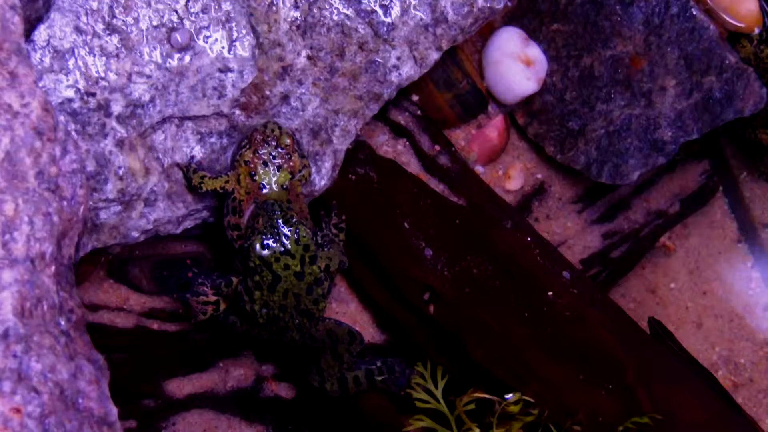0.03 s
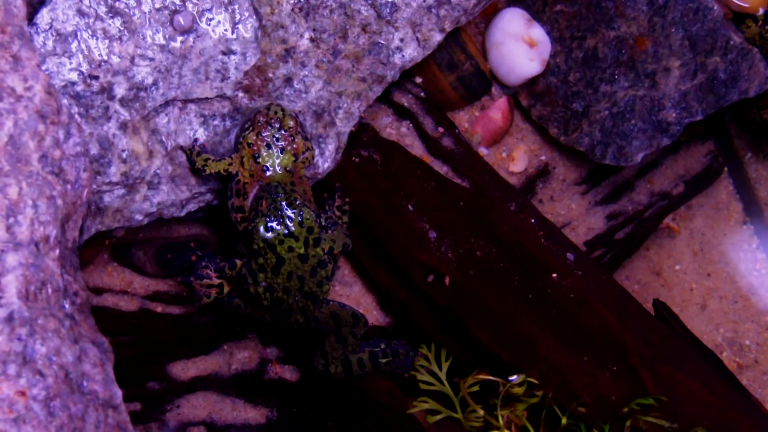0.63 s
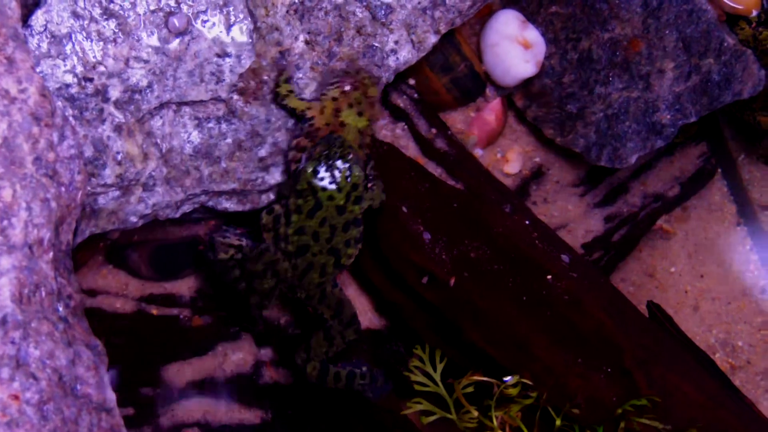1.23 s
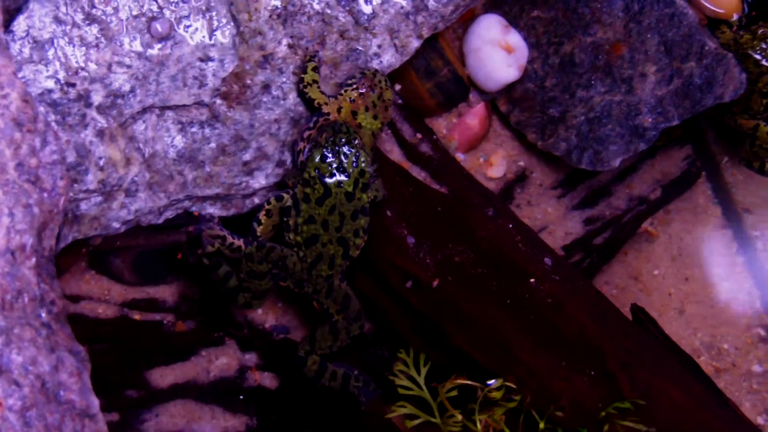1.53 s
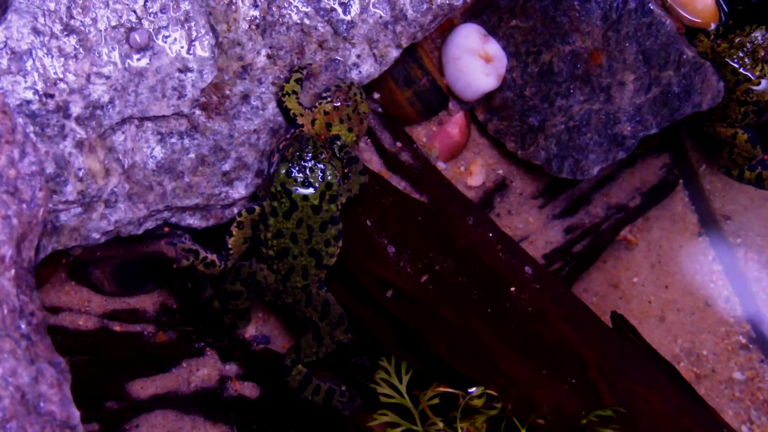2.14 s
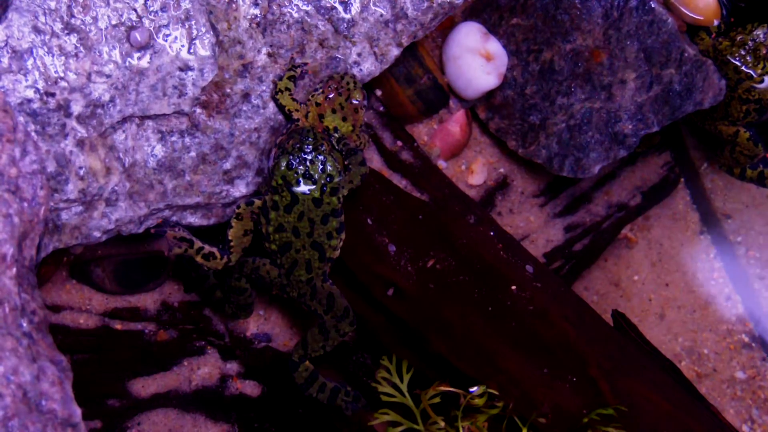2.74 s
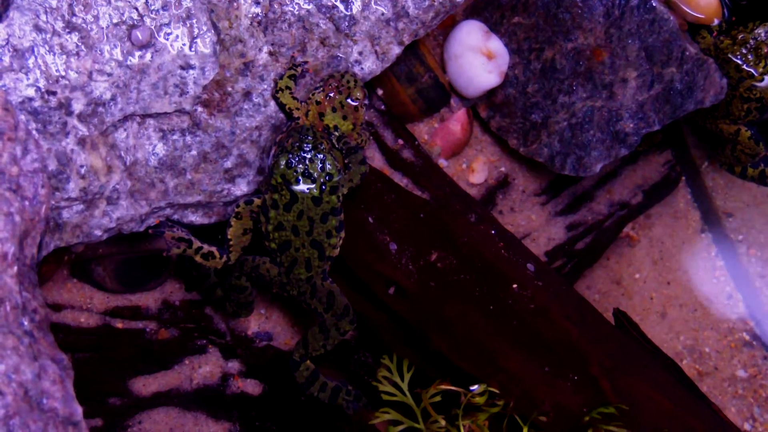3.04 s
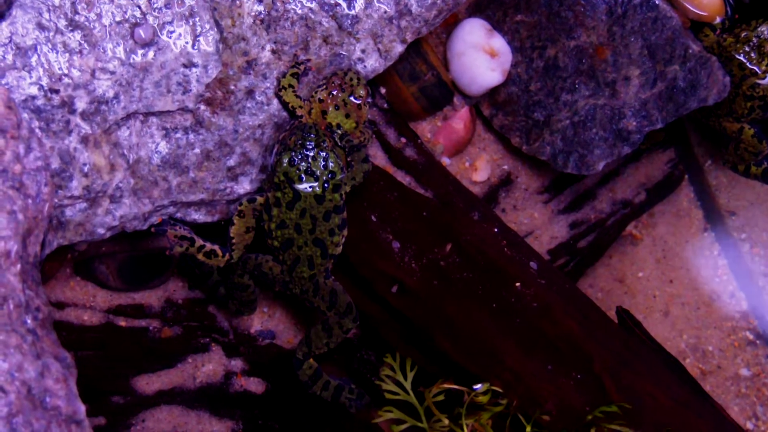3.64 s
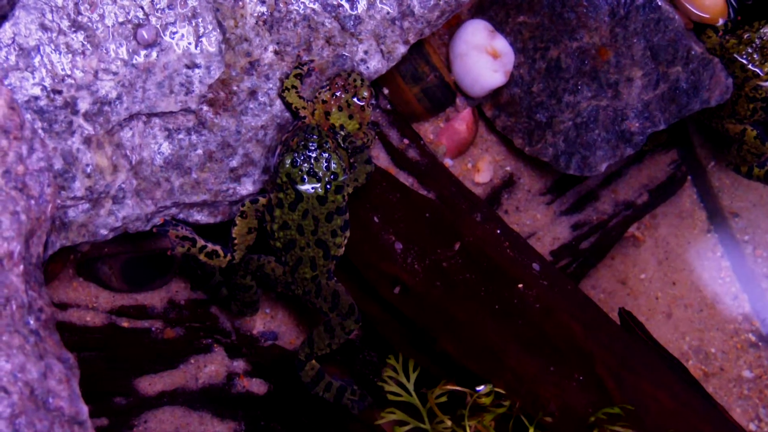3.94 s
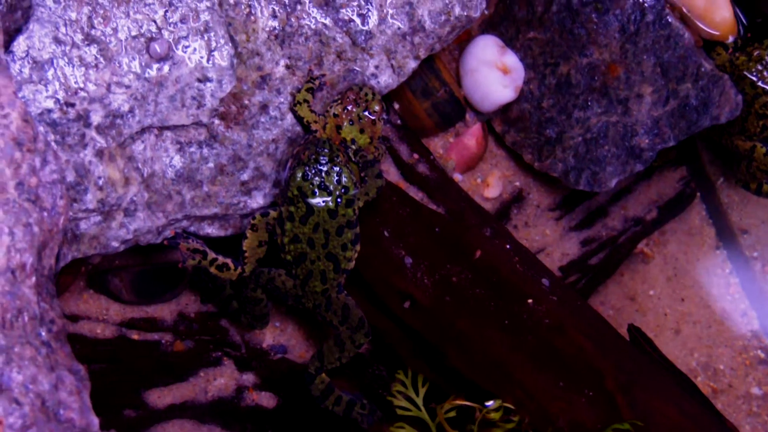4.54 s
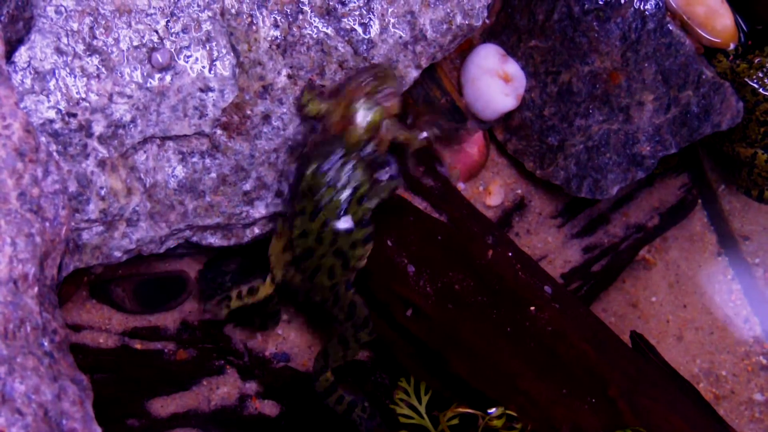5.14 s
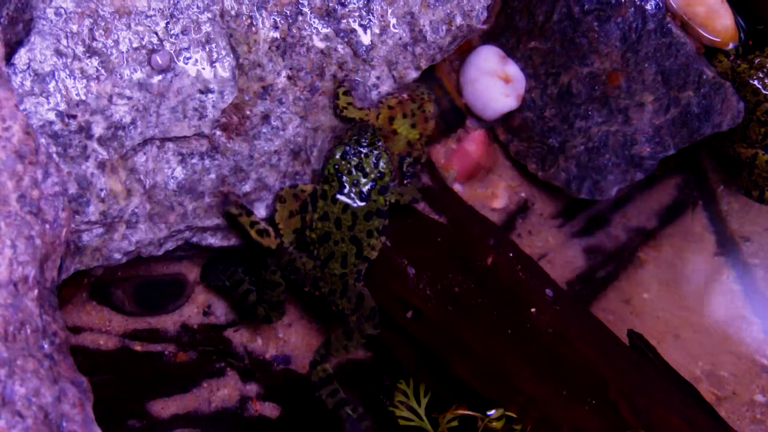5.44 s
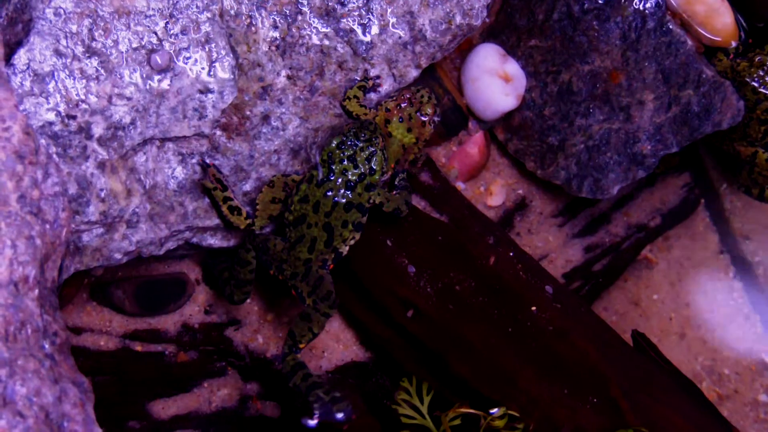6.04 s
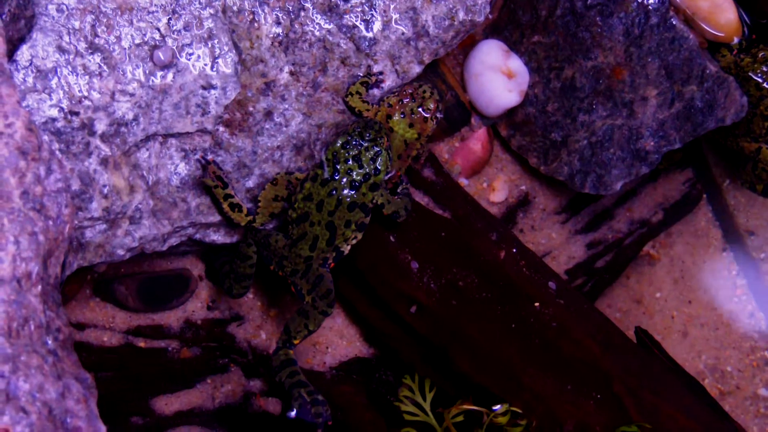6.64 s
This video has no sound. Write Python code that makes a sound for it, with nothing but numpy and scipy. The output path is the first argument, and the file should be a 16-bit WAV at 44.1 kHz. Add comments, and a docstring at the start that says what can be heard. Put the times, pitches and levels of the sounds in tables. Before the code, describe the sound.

After a soft thump and brief buzz, microphone hiss, a thin whine and a low throbbing hum fade in. A small toad in a glass tank gives two soft hoots, then repeated bursts of short yelps, each sinking in pitch, with a close echo. Water ticks faintly throughout. Later a deep, soft shudder swells as wet skin rubs on stone, and a small plop comes near the end.

```python
"""A soft thump and a faint buzz open the scene; a camera's hiss and whine, room rumble and a throbbing hum fade
in. A small toad in a glass tank pushes air through its voice box in two soft hoots, and the walls echo. Water
starts to tick faintly, and the toad goes on to bursts of short yelps that each sink in pitch. Around five
seconds a deep shudder swells and wet skin rubs on stone. A small plop comes near the end."""
import sys
import numpy as np
from scipy import signal
from scipy.fft import rfft, irfft, next_fast_len
from scipy.io import wavfile
from scipy.ndimage import uniform_filter1d

SR = 44100
rng = np.random.default_rng(int(sys.argv[2]) if len(sys.argv) > 2 else 0)


def digitize_waveform(pressure):
    """Quantize a signal to 16-bit integers and store it at the path in sys.argv[1].

    Rows of a 2-D input are taken as channels; values are limited to [-1, 1].
    """
    field = np.atleast_2d(pressure).T
    bounded = np.clip(field, -1, 1)
    quanta = np.round(bounded * 32767).astype(np.int16)
    wavfile.write(sys.argv[1], SR, quanta)


N = 303849
TIME = np.arange(N) / SR
SIZE = next_fast_len(N + SR)  # a spare second lets echoes die away
FREQ = np.maximum(np.arange(SIZE // 2 + 1) * SR / SIZE, 1e-3)
WAKE_S = 0.057  # when the camera wakes


def undb(db):
    """Turn decibels into a number to multiply by."""
    return 10 ** (np.asarray(db) / 20)


def level(x, db):
    """Set a sound's average (rms) level."""
    return x * undb(db) / np.sqrt(np.mean(x ** 2))


def colour(rows):
    """Join (Hz, dB) points into a gain for every frequency."""
    hz, db = np.transpose(rows)
    return undb(np.interp(np.log(FREQ), np.log(hz), db))


def resonance(hz, width):
    """Something that rings: it passes its own frequency fully and others less."""
    return 1 / (1 + 1j * (FREQ / hz - hz / FREQ) * hz / width)


def filtered(x, response):
    """Turn each frequency of a sound up or down by the given response."""
    return irfft(rfft(x, SIZE) * response, SIZE)[:N]


def noise(response):
    """Noise shaped by a response, with an average (rms) size of 1."""
    return level(filtered(rng.standard_normal(N), response), 0)


def drift(rate_hz):
    """A random wander, mostly slower than the given rate."""
    return noise(1 / (1 + (FREQ / rate_hz) ** 4))


def add(out, start, x):
    """Mix in a short sound at a start time in seconds."""
    i = max(int(start * SR), 0)
    out[i:i + len(x)] += x[:max(N - i, 0)]


def switch_on(thump_db=-36, settle_s=0.35, dull_hz=2500, buzz_hz=185, buzz_db=-58, buzz_s=0.26):
    """A soft thump and a faint buzz that slides down a few times open the scene."""
    awake = TIME > WAKE_S
    since = np.maximum(TIME - WAKE_S, 0)
    thump = filtered(awake * np.exp(-since / settle_s), 1 / (1 + 1j * FREQ / dull_hz))
    slide = 1 + 0.14 * (0.5 - since / 0.054 % 1)  # starts again every 0.054 s
    sawtooth = np.cumsum(buzz_hz * slide) / SR % 1 - 0.5
    buzz = sawtooth * awake * np.exp(-(since / buzz_s) ** 4)
    return undb(thump_db) * thump + undb(buzz_db) * buzz


def fade_in(wake_rise_s=0.03, idle_db=-15, fade_s=0.17, open_at_s=0.41):
    """The volume of the camera's input: shut at first, then low, then rising to full."""
    awake = np.clip((TIME - WAKE_S) / wake_rise_s, 0, 1)
    return awake * undb(idle_db * np.clip((open_at_s - TIME) / fade_s, 0, 1))


def hum(waver=0.14, in_step_s=0.49):
    """A motor turns just slower than the mains hum, so the two throb about four times a second."""
    # Motor and mains tones. Each row: frequency in Hz, level in dB.
    tones = [(55.91, -48.4), (59.97, -54), (98.31, -66), (119.97, -57.3), (239.94, -70), (299.9, -77),
             (419.9, -75), (479.9, -80)]
    return np.sqrt(2) * sum(
        undb(db) * (1 + waver * drift(3)) * np.cos(2 * np.pi * hz * (TIME - in_step_s))
        for hz, db in tones)


def room_rumble(rumble_db=-53, swell_db=1):
    """Low, slightly restless room noise."""
    # The rumble's tone. Each row: frequency in Hz, relative level in dB.
    rumble_shape = [(15, -4.5), (28, -3), (45, -6.5), (70, -10.5), (100, -8), (145, -6.5), (200, -22.5),
                    (320, -23.5), (600, -25.5), (1100, -33), (1400, -43), (3000, -91)]
    return noise(colour(rumble_shape)) * undb(rumble_db + swell_db * drift(5.4))


def camera_noise(hiss_db=-62.5, whine_db=-78, whine_hz=9000, sweep_hz=350, sweeps_per_s=29.97):
    """The camera's hiss, coloured by its case, and a thin, unsteady whine that keeps sweeping up."""
    # The hiss's tone. Each row: frequency in Hz, relative level in dB.
    hiss_shape = [(300, 0.5), (1400, -1), (2100, -1), (3300, 0.5), (4000, -2), (5200, 1.5), (7000, -1),
                  (8500, 0.5), (9100, -4.5), (9600, -12), (11000, -10.5), (15000, -9.5)]
    # Peaks and dips made by the case. Each row: frequency in Hz, width in Hz, boost or cut in dB.
    case_ripples = [(1414, 106, -6), (1625, 140, 7.5), (1820, 56, -3.5), (2074, 154, 8.5), (2474, 110, 5),
                    (2633, 58, -10), (2808, 100, 5), (3190, 55, 4.5), (6440, 210, 3), (6870, 150, 0),
                    (7240, 150, 5), (7930, 205, 6.5), (8470, 150, -5.5), (11450, 280, 3.5)]
    ripple_db = sum(db * np.exp(-((FREQ - hz) / width) ** 2) for hz, width, db in case_ripples)
    hiss = noise(colour(hiss_shape) * undb(ripple_db))
    sweep = (TIME * sweeps_per_s) % 1
    pitch_hz = whine_hz + sweep_hz * (2 * sweep - 1) + 120 * drift(15)
    phase = 2 * np.pi * np.cumsum(pitch_hz) / SR
    whine = np.sin(phase) * np.sin(np.pi * sweep) ** 4 * drift(230)
    return undb(hiss_db) * hiss + level(whine, whine_db)


def push(length_s, rise_s, fall_s, fade_db, scoop, dive):
    """One push of air as (pitch factor, dB): it swells and scoops up, then fades and dives."""
    t = np.arange(1, int(length_s * SR)) / SR
    rise = np.sin(np.pi / 2 * np.minimum(t / rise_s, 1))
    fall = np.clip(1 - (length_s - t) / fall_s, 0, 1)
    bend = 1 - scoop * (1 - rise) - dive * fall ** 2
    swell_db = 20 * np.log10(rise) - fade_db * fall ** 1.56
    return bend, swell_db


def voice_box(hz, db, effort_db, bright_db=0, jitter=0.0052, rasp=0.079):
    """A raspy buzz that favours twice its pitch; effort changes the mix, brightness lifts the top."""
    # The tones in the buzz. Each row: multiple of the pitch, relative level in dB,
    # dB gained per dB of effort.
    harmonics = [(1, -8.5, 0.5), (2, 2, 0), (3, -14.5, -0.17), (4, -20.5, -.5), (5, -27.5, -0.55),
                 (6, -39.5, 1.35)]
    waver, flutter = uniform_filter1d(rng.standard_normal((2, len(hz))), size=100) * np.sqrt(100)
    phase = 2 * np.pi * np.cumsum(hz * (1 + jitter * waver)) / SR
    buzz = sum(undb(gain_db + slope * effort_db + bright_db * (multiple >= 5)) * np.sin(multiple * phase)
               for multiple, gain_db, slope in harmonics)
    return undb(db) * (1 + rasp * flutter) * buzz


def hoots():
    """Long, gentle pushes of air: the second hoot stutters in three, and a brief one joins the yelps."""
    # Each row: start in seconds, length in seconds, pitch in Hz, relative level in dB.
    pushes = [(.362, 0.12, 598.6, -45.5), (0.828, 0.042, 579, -55), (.852, .058, 591, -46.5),
              (.899, 0.034, 570, -53), (5.353, .037, 639, -49.5)]
    out = np.zeros(N)
    for start, length, hz, db in pushes:
        bend, swell_db = push(length, 0.547 * length, 0.477 * length, fade_db=17, scoop=0.049, dive=0.147)
        add(out, start, voice_box(hz * bend, db + swell_db, effort_db=2, bright_db=6))
    return out


def throat(calls):
    """The toad's throat and body ring, boosting parts of its voice."""
    # Where they ring. Each row: frequency in Hz, width in Hz, strength in dB.
    body_rings = [(1181, 43, -3.5), (1662, 38, 10), (2212, 57, 8), (3210, 105, 17)]
    return filtered(calls, 1 + sum(undb(db) * resonance(hz, width) for hz, width, db in body_rings))


def tank(x, tail_db=-20, tail_s=0.46, build_s=0.035):
    """Sound bounces between the glass panes, rings in the tank and leaves a soft tail in the room."""
    # Echoes off the nearest rocks and walls. Each row: delay in seconds, strength in dB.
    near_echoes = [(.01077, -4.5), (.01122, -7.5), (.01183, -7), (.0249, -13), (.0414, -12)]
    # Notes at which the tank rings. Each row: frequency in Hz, width in Hz, strength in dB.
    standing_waves = [(1183, 5.1, -2), (1030, 7.6, 4)]

    def echo(delay_s, db):
        return undb(db) * np.exp(-2j * np.pi * FREQ * delay_s)

    early = 1 + sum(echo(delay_s, db) for delay_s, db in near_echoes)
    early /= 1 - echo(delay_s=0.00477, db=-12)  # repeated round trips between two facing panes
    t = TIME[:SR]
    tail = rng.standard_normal(SR) * undb(-60 * t / tail_s) * (1 - np.exp(-(t / build_s) ** 2))
    tail /= np.sqrt(np.sum(tail ** 2))
    ring = 1 + sum(undb(db) * resonance(hz, width) for hz, width, db in standing_waves)
    return filtered(x, ring * (early + undb(tail_db) * rfft(tail, SIZE)))


def drips(boost_db=3, scatter_s=0.024, bubbles=28, ring_s=0.037):
    """Each tick of water is a cluster of bubbles that ring briefly at nearby pitches."""
    # Each row: start in seconds, pitch in Hz, relative level in dB, spread as a share of the pitch.
    ticks = [(1.195, 4250, -63, 0.05), (1.24, 2530, -58, 0.06), (2.06, 4750, -60, 0.1),
             (2.41, 3880, -60.5, 0.01), (2.55, 6600, -57, 0.18), (2.86, 4970, -63, 0),
             (3.38, 2180, -59, 0.07), (3.84, 2200, -58.5, 0.01), (4.05, 1730, -58.5, 0.01),
             (4.26, 4900, -61, 0.06), (4.53, 8340, -62, .04), (4.845, 7550, -58, .06),
             (5.07, 7350, -56, .11), (5.245, 8300, -60, .04), (5.515, 7600, -56.5, .1),
             (5.9, 4007, -62, .01), (5.944, 7500, -51.5, .07), (6.091, 2230, -54, 0.02),
             (6.205, 4050, -63, 0.05), (6.835, 2220, -53, .04)]
    out = np.zeros(N)
    t = TIME[:SR // 8]
    fade = undb(-60 * t / ring_s) * (1 - np.exp(-t / 0.00024))
    for start, hz, db, spread in ticks:
        for late, detune in zip(rng.random(bubbles), rng.standard_normal(bubbles)):
            bubble = np.sin(2 * np.pi * hz * (1 + spread * detune) * t) * fade
            add(out, start + scatter_s * late, undb(db + boost_db) * bubble / np.sqrt(bubbles))
    return out


def yelps(usual_db=-44, usual_hz=577.1, hz_per_db=5, slack_hz=544, scatter_hz=3, trim_db=-4.5):
    """Quick pushes of air that dive in pitch; harder ones start higher, and most bursts weaken."""
    # Bursts of yelps. Each row: start in seconds, number of yelps, seconds from one to the next,
    # relative level of the first in dB, change per yelp in dB.
    bursts = [(1.445, 3, .06, -56, 1.9), (1.626, 2, 0.063, -45.5, -8), (1.761, 3, 0.062, -43, -2.5),
              (1.955, 2, .068, -41.5, -8.5), (2.087, 2, .067, -42.5, -3.5), (2.233, 3, 0.065, -39.5, -5.5),
              (2.428, 2, .072, -42, 1.5), (2.58, 4, 0.069, -40, -2), (2.892, 3, 0.063, -43.5, -3.5),
              (3.131, 3, 0.074, -40, -6), (3.458, 2, 0.069, -41.5, -6.5), (3.611, 2, .075, -45, -5),
              (4.231, 1, 0, -56.5, 0), (4.552, 5, 0.057, -58, 2), (4.867, 2, .071, -40.5, -1.5),
              (5.014, 2, 0.071, -39.5, -2), (5.184, 1, 0, -54.5, -1), (5.352, 3, 0.065, -41.5, -3.5),
              (5.542, 2, 0.064, -43, -1.5), (5.685, 3, .066, -39, -2.5), (5.902, 3, .07, -39, -1.5),
              (6.123, 2, 0.077, -38.5, -3.5)]
    out = np.zeros(N)
    bend, swell_db = push(length_s=0.032, rise_s=0.0097, fall_s=0.0212, fade_db=33.5, scoop=0, dive=0.533)
    for start, count, gap, first_db, step_db in bursts:
        for k in range(count):
            db = first_db + k * step_db
            effort_db = db - usual_db
            hz = max(usual_hz + hz_per_db * effort_db, slack_hz) + scatter_hz * rng.standard_normal()
            add(out, start + k * gap, voice_box(hz * bend, db + trim_db + swell_db, effort_db))
    return out


def shudder(middle_s=5.14, half_s=0.61, hz=29, width_hz=9, db=-52):
    """A deep, soft shudder swells and fades under the later yelps."""
    swell = np.exp(-((TIME - middle_s) / half_s) ** 4)
    return noise(resonance(hz, width_hz) ** 2) * undb(db) * swell


def rubbing(grain_db=2):
    """The toad's wet skin rubs on stone with an uneven whisper that swells at each shove."""
    # Where the rubbing rings. Each row: frequency in Hz, width in Hz, strength in dB.
    rub_rings = [(1940, 570, 5.5), (3660, 350, -0.5), (4460, 740, -2)]
    # Each row: middle of a shove in seconds, half its length in seconds, level in dB.
    shoves = [(5.026, 0.22, -64), (5.277, .06, -62), (5.547, 0.044, -64)]
    tone = sum(undb(db) * np.abs(resonance(hz, width)) ** 2 for hz, width, db in rub_rings)
    whisper = noise(tone) * undb(grain_db * drift(40))
    swell = sum(undb(db) * np.exp(-((TIME - middle) / half) ** 2) for middle, half, db in shoves)
    return level(whisper, 0) * swell


def plop(start_s=6.762, hz=1010, db=-53):
    """One small wet plop whose pitch arches up and down."""
    out = np.zeros(N)
    bend, swell_db = push(length_s=0.033, rise_s=0.0156, fall_s=0.02, fade_db=23, scoop=0.38, dive=0.7)
    phase = 2 * np.pi * np.cumsum(hz * bend) / SR
    add(out, start_s, undb(db + swell_db) * np.sin(phase))
    return out


def scene():
    """The toad and the water in the tank, over the background, in one channel."""
    background = (hum() + room_rumble() + shudder() + camera_noise()) * fade_in()
    toad = throat(yelps() + hoots())
    return (switch_on() + background + tank(toad + drips()) + rubbing() + plop())[None]


def record(dry, top_hz=15030):
    """The camera cuts off the highest treble."""
    return signal.sosfilt(signal.ellip(12, 0.1, 70, top_hz, fs=SR, output="sos"), dry)


dry = scene()
out = record(dry)
digitize_waveform(out)
```